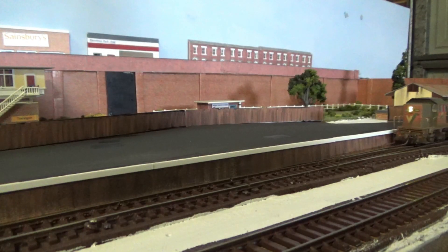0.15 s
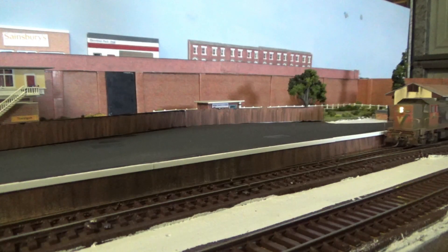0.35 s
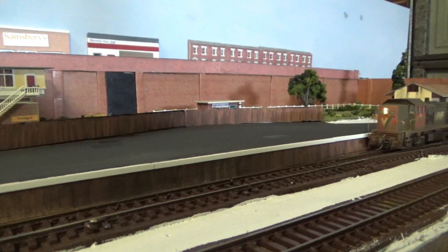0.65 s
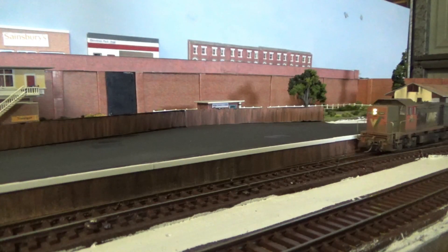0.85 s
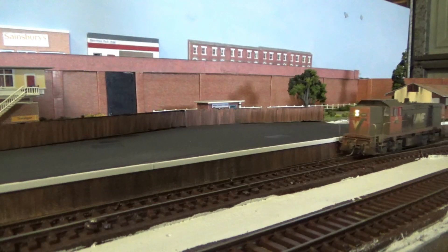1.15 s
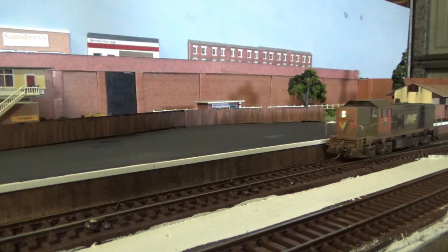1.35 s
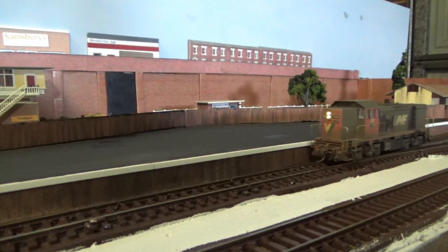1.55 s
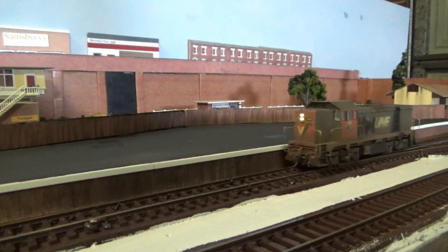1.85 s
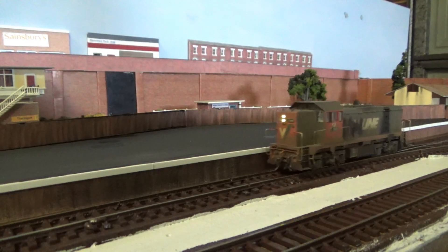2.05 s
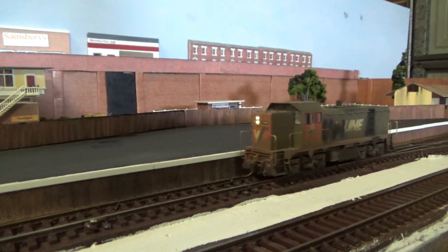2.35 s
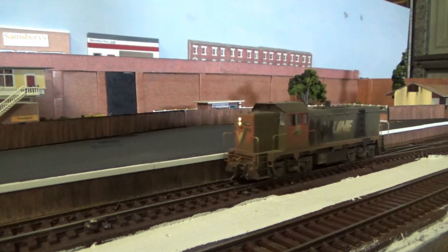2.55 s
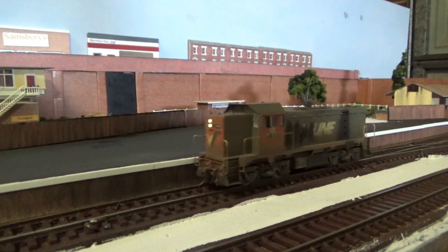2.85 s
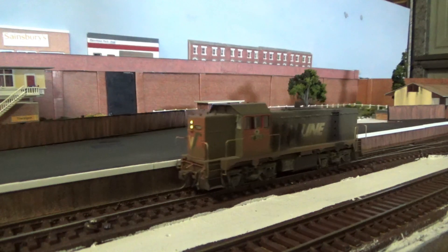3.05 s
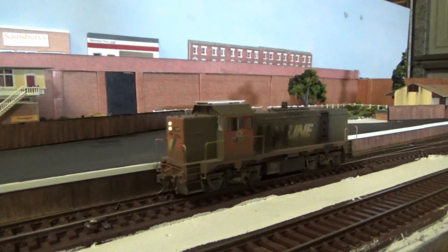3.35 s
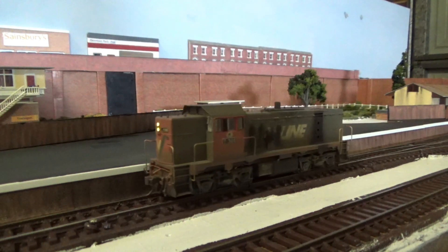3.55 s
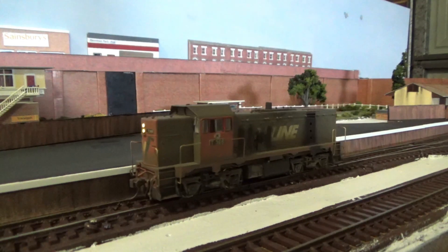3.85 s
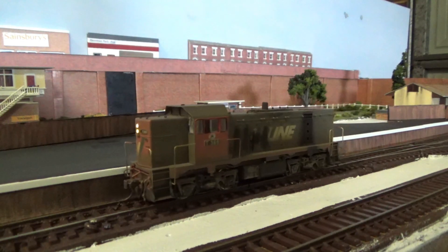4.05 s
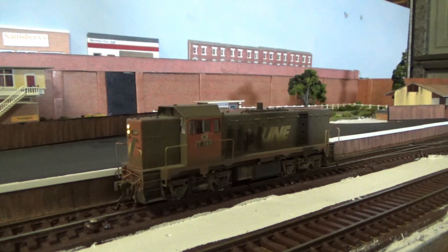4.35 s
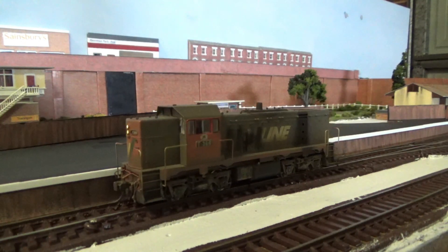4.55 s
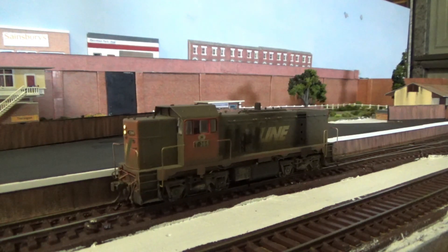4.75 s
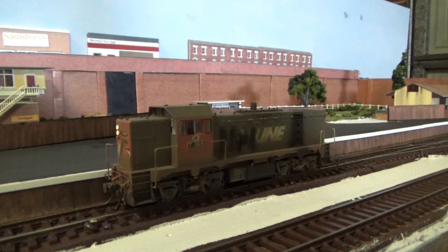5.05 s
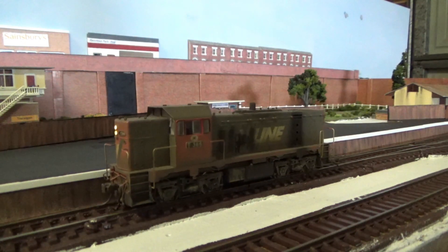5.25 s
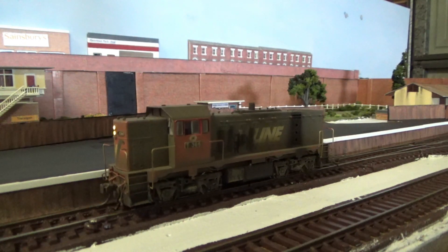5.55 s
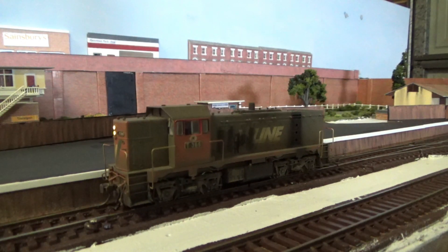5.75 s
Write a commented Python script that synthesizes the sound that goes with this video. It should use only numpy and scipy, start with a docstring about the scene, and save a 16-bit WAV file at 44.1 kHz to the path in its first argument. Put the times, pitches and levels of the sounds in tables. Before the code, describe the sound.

A model diesel locomotive rolls closer with rattling wheels and sharp clicks over rail joints, then slows to a buzzing crawl and stops.

```python
"""A small room with a model railway, the microphone about 0.3 m from the track.
A model diesel rolls up from under a metre away and slows to a stop. Its wheels drum on the baseboard,
knock over rail joints, tick on grit and squeak once; the pickup wipers sing thinly on them.
At a crawl the pulsed motor buzzes through the body shell until the drive cuts out with a soft click.
Mains hum and faint hiss lie behind it all."""
import sys
import numpy as np
from scipy import signal
from scipy.fft import rfft, irfft, next_fast_len
from scipy.io import wavfile
from scipy.ndimage import uniform_filter1d, map_coordinates

SR = 44100
rng = np.random.default_rng(int(sys.argv[2]) if len(sys.argv) > 2 else 0)


def put_to_file(sound):
    """Save the sound as 16-bit audio at rate SR, in the file named by the first command-line argument."""
    columns = np.atleast_2d(sound).T  # one column per channel
    safe = np.clip(columns, -1, 1)
    whole_steps = np.round(safe * 32767)
    wavfile.write(sys.argv[1], SR, whole_steps.astype(np.int16))


N = 259737
TIME = np.arange(N) / SR

# mains hum and faint whine: (frequency [Hz], rms level [dB])
HUM_LINES = [(100, -91), (150, -89), (200, -80.5), (300, -72.5), (400, -69), (500, -83), (7800, -93),
             (8759, -85)]
# decay of the room: (frequency [Hz], t60 [s])
ROOM_DECAY = [(200, 0.16), (1000, 0.91), (3000, 1), (10000, 0.44)]
# spectral shapes: (frequency [Hz], relative level [dB])
ROOM_SPECTRUM = [(200, 11), (1200, -1.5), (3000, -11), (10000, -32)]  # reverberation
AIR_SPECTRUM = [(15, -63), (25, -33.5), (169, -19.5), (192, -29), (229, -15.5), (296, -14.5), (362, -9.5),
                (401, -14), (433, -12.5), (685, -18.5), (819, -14), (7700, -26), (11000, -28), (14300, -65),
                (22000, -120)]  # room tone
RUMBLE_SPECTRUM = [(60, -20.5), (160, -11.5), (300, -5.5), (520, 0), (720, 5.5), (900, -2), (1200, -0.5),
                   (1600, -3), (2100, -5.5), (2700, -8), (3300, -29), (4500, -22), (9000, -33)]  # wheel treads
RAIL_SPECTRUM = [(1200, -50), (2200, 5), (3300, 5), (4200, -0.5), (5200, 1.5), (6300, -2), (7200, -15),
                 (9000, -7), (11000, -38)]  # rail hiss
GEAR_SPECTRUM = [(4000, -17), (6800, -3.5), (7900, 1.5), (8800, -0.5), (9500, 0), (10200, -2.5),
                 (11000, -7)]  # gear sizzle
CRACK_SPECTRUM = [(400, -24), (1500, 2.5), (2400, -4), (3300, -10), (4200, -8.5), (5100, -1.5),
                  (6700, -5.5), (8500, -7.5), (11000, -14)]  # hard contact
GRIT_SPECTRUM = [(500, -21), (2000, -33), (3500, 0), (5000, -3), (6500, 3.5), (8400, 5), (9700, 5.5),
                 (11000, -5.5)]  # bright ticks and crackle
# resonances: (frequency [Hz], width [Hz], relative level [dB])
TRACK_MODES = [(529, 16, -0.5), (716, 58, -5), (1019, 41, 0.5), (1125, 85, 3), (1218, 92, 2.5),
               (1390, 47, -13), (1593, 46, -0.5), (1890, 140, -9), (2580, 43, -33)]  # track on its board
SHELL_MODES = [(2318, 87, 12.5), (2570, 120, 0.5), (2750, 120, -2.5), (2980, 71, 0), (3305, 100, 2),
               (3395, 86, -7), (3960, 220, -2.5)]  # plastic body shell
FLANGE_MODES = [(3070, 600, -10.5), (5280, 160, 7), (6770, 600, 0.5), (8450, 470, 0), (9860, 240, 5.5),
                (11300, 400, -18)]  # squeaking wheel
# ringing of struck parts: (ratio to the blow's pitch, relative level [dB], t60 [s])
BOARD_MODES = [(.62, -28.5, 0.09), (.72, -13, 0.042), (.91, -8.5, 0.039), (1.0, -0.5, 0.029),
               (1.09, -7.5, 0.026), (1.35, -15, 0.04), (1.57, -20.5, 0.058)]
BOGIE_MODES = [(.77, -15, 0.066), (.9, -13, 0.053), (1.0, -1, 0.021), (1.13, -8, 0.014)]
ARMATURE_MODES = [(.93, 0, .018), (1.0, 4, 0.027), (1.07, -7, .018), (1.3, -1, 0.017)]
# the locomotive cruises, brakes and creeps: (time [s], speed [m/s])
LOCO_SPEED = [(0, 0.21), (2.95, .2), (3.4, 0.12), (4.2, 0.082), (4.8, 0.07), (5.3, 0.045), (5.89, 0.029)]
# motor drive: (time [s], pulse rate [Hz])
PULSE_RATE = [(0, 87.5), (2.2, 86), (2.9, 87.5), (3.25, 90), (3.43, 93), (3.57, 91.5), (3.72, 94.6),
              (4.03, 95.8), (4.12, 94.1), (4.22, 95.7), (4.33, 95.4), (4.42, 96.2), (4.52, 92.5),
              (4.61, 90.5), (4.72, 91.9), (4.8, 91.2), (4.9, 95.7), (5.03, 97.5), (5.17, 98), (5.28, 97.4),
              (5.42, 97.7), (5.52, 98.4), (5.62, 98.1)]
# uneven rail contact makes the buzz dip or surge: (middle [s], length [s], gain [dB])
CONTACT_SWELLS = [(3.555, 0.052, 8), (3.72, 0.12, 1.5), (3.924, 0.14, 5), (4.048, 0.09, -24),
                  (4.1, 0.039, 7), (4.19, .04, -1), (4.23, 0.039, 0.5), (4.334, 0.063, 3),
                  (4.42, 0.034, -6), (4.603, 0.45, 2.5), (4.87, 0.055, -7), (5.463, 0.091, -4),
                  (5.575, 0.11, 3.5)]
# clicks of the drive settling: (time [s], relative level [dB], pitch [Hz])
SETTLING_CLICKS = [(5.623, -45.5, 2680), (5.652, -56, 2800), (5.676, -61, 3520), (5.753, -57, 3500),
                   (5.834, -59, 3520)]
# spells of wiper singing: (middle [s], length [s], pitch [Hz], level [dB], width [Hz])
WIPER_SPELLS = [(0.356, 0.4, 8140, -67, 600), (1.45, 0.4, 8400, -66, 700), (2.473, 0.43, 9600, -66.5, 900),
                (4.614, 0.39, 9900, -71, 300)]
# wheel squeak: (start [s], end [s], level [dB])
FLANGE_SQUEAKS = [(4.010, 4.043, -44.5)]
# dirty stretches of rail: (middle [s], length [s], extra hiss [dB], extra crackle [dB])
DIRTY_RAIL = [(0.163, 0.18, 0.5, 9), (0.534, 0.11, 5.5, 11), (0.886, 0.36, 4, 6.5), (1.33, 0.2, 3, 8.5),
              (1.64, 0.14, 4, 5.5), (2.09, 0.49, 4.5, 3.5), (2.626, 0.044, 7, 4.5), (3.67, 0.46, 3.5, 1.5),
              (4.23, 0.3, 5, 7.5), (4.81, 0.33, 5.5, 5)]
# the loudest grit: (time [s], relative level [dB], knock against that level [dB])
GRIT_TICKS = [(0.1126, -35.5, -10), (0.1595, -39, -1.5), (0.3022, -44, -15), (0.5212, -40, -10),
              (0.6609, -37, -10), (0.7372, -41.5, -8), (0.797, -39, 3.5), (0.8295, -39.5, -1),
              (0.8594, -36, -12), (0.9168, -43.5, 4), (1.0141, -38, -13), (1.0783, -43.5, 4.5),
              (1.2077, -36.5, -15), (1.2785, -36.5, -4.5), (1.296, -37.5, -3), (1.5055, -33, -18),
              (1.5514, -31.5, -18), (1.5978, -32, -18), (1.6207, -36, -15), (1.6432, -35, -7.5),
              (1.6772, -41, -2), (1.8766, -32, -18), (2.0386, -20, -29), (2.6486, -31, -12),
              (2.774, -30.5, -27), (2.9257, -53, -22), (2.9612, -34, -23), (3.03, -33, -18),
              (3.159, -47, 1.5), (3.1837, -31.5, -18), (3.273, -31, -33), (3.3577, -33.5, -12.5),
              (3.555, -41, -8), (3.5738, -39, -20), (3.6026, -33, -23), (3.6262, -30.5, -30),
              (3.6985, -33, -19), (3.716, -30, -25), (3.789, -35, -17), (3.909, -40, -17),
              (3.977, -38.5, -26), (4.087, -48.5, -2.5), (4.164, -36.5, -20), (4.208, -41, -28),
              (4.2737, -39, -28), (5.175, -35, -28), (5.27, -39, -28)]
# rail joints and small bumps, at relative levels:
# (time [s], crack [dB], thud [dB], thud pitch [Hz], clack [dB], clack pitch [Hz])
RAIL_JOINTS = [(0.3440, -28, -21, 1036, -22, 2550), (0.627, -34.5, -19.5, 1176, -25.5, 2350),
               (0.933, -38.5, -37, 1090, -37.5, 2600), (1.7942, -25.5, -24, 1196, -30.5, 2910),
               (2.0856, -25, -17.5, 1084, -23.5, 2030), (2.687, -59, -37, 1140, -58, 2280),
               (2.742, -24.5, -30.5, 1145, -27, 2260), (2.8722, -36.5, -34.5, 1027, -37, 2500),
               (3.2132, -29.5, -34, 740, -29.5, 2170), (3.4, -45.5, -42, 796, -48, 2220),
               (4.385, -63, -49, 960, -56, 2040), (4.67, -69, -48, 1190, -65, 1930),
               (4.811, -60, -49, 880, -49.5, 1590), (4.923, -60, -59, 1139, -44.5, 2630),
               (4.945, -69, -48, 850, -50, 1490)]
# swells of the baseboard under the wheels: (time [s], relative level [dB])
BOARD_LEVEL = [(0.0, -56), (0.2, -54), (0.62, -55), (0.74, -54.5), (0.89, -59.5), (1.28, -59.5),
               (1.55, -59.5), (1.72, -54.5), (1.9, -56), (2.1, -53.5), (2.48, -60), (2.68, -59.5),
               (2.79, -57.5), (3.51, -66.5), (4.04, -76), (4.92, -70), (5.31, -75.5), (5.89, -83)]
# the band where the shell radiates well: (low edge [Hz], high edge [Hz])
SHELL_BAND = [2436, 3810]

CRUISE_M_PER_S = 0.2
START_M, PASSING_M = 0.79, 0.31  # distance along the track at the start; from track to microphone
# levels at cruising speed; each slope is in dB per tenfold speed
RUMBLE_DB, RUMBLE_SLOPE = -61.5, 18.5
RAIL_DB, RAIL_SLOPE = -61, 28
DRUM_TRIM_DB, DRUM_SLOPE = -0.05, 4.5  # on top of BOARD_LEVEL
GEAR_DB, GEAR_SLOPE, CRACKLE_DB = -70.5, 28, -2.5  # gears at 1 m; crackle against the gears
GEAR_LOSS_DB, BUZZ_LOSS_DB = 31.5, 8  # lost at tenfold distance
BUZZ_DB, MOTOR_OFF_S, MOTOR_FADE_S = -71.5, 5.64, 0.012  # buzz at 1 m; when and how fast it dies


def amp(db):
    """Decibels to gain."""
    return 10 ** (np.asarray(db) / 20)


def unit(x):
    """Scale to rms 1."""
    return x / np.sqrt(np.mean(x ** 2) + 1e-20)


def along(points, hz):
    """(Hz, value) points read on a log axis."""
    freqs, values = np.transpose(points)
    return np.interp(np.log(hz + 1), np.log(freqs + 1), values)


def curve(points):
    """(time, value) points read at every sample."""
    return np.interp(TIME, *np.transpose(points))


def swell(middle, length):
    """A rounded rise and fall, 0 to 1 and back."""
    return np.cos(np.pi * np.clip((TIME - middle) / length, -.5, .5))


def wobble(rate):
    """A smooth random curve, rate knots a second."""
    coarse = TIME[::32]
    knots = rng.standard_normal(int(N * rate / SR) + 4)
    return np.interp(TIME, coarse, map_coordinates(knots, [coarse * rate]))


def filtered(x, response):
    """x through a complex frequency response."""
    n = x.shape[-1]
    padded = next_fast_len(n + 8192)
    return irfft(rfft(x, padded) * response(np.fft.rfftfreq(padded, 1 / SR)), padded)[..., :n]


def coloured(x, spectrum):
    """x shaped by a spectrum, at rms 1."""
    return unit(filtered(x, lambda hz: amp(along(spectrum, hz))))


def resonate(x, modes):
    """x through (Hz, width, dB) resonances, at rms 1."""
    def response(f):
        return sum(amp(db) * 1j * f * width / (hz * hz - f * f + 1j * f * width)
                   for hz, width, db in modes)
    return unit(filtered(x, response))


def patchy(depth_db):
    """White noise with patches of random gain in time and frequency."""
    bins = signal.stft(rng.standard_normal(N), nperseg=512)[2]
    patches = uniform_filter1d(rng.standard_normal(bins.shape), size=5, axis=0)
    patches = uniform_filter1d(patches, size=20, axis=1)
    return unit(signal.istft(bins * amp(depth_db * unit(patches)), nperseg=512)[1][:N])


def add(track, s, sound):
    """Mix a sound into a track at time s."""
    part = track[max(round(s * SR), 0):][:len(sound)]
    part += sound[:len(part)]


def ring(modes, hz, t, attack):
    """Damped modes, struck together, at new strengths for each blow."""
    swing = sum(amp(db + rng.normal(0, 1) - 60 * t / t60) * np.sin(2 * np.pi * ratio * hz * t)
                for ratio, db, t60 in modes)
    return swing * (1 - np.exp(-t / attack))


def snap(spectrum, t, t60, tail_db, tail_t60):
    """A sharp burst of contact noise with a weak rattle after it."""
    burst = rng.choice([-1, 1], len(t)) * (amp(-60 * t / t60) + amp(tail_db - 60 * t / tail_t60))
    return filtered(np.pad(burst, (16, 0)), lambda hz: 1.5 * amp(along(spectrum, hz)))[16:]


def low_cut(x, corner_hz=580):
    """A low cut thins the bass of the knocks and ticks."""
    return signal.sosfilt(signal.butter(2, corner_hz, "highpass", fs=SR, output="sos"), x)


def journey():
    """Speed in decades against cruising, and distance from the microphone in decades against 1 m."""
    speed = curve(LOCO_SPEED)
    distance = np.hypot(START_M - np.cumsum(speed) / SR, PASSING_M)
    return np.log10(speed / CRUISE_M_PER_S), np.log10(distance)


def dirt():
    """Extra rail hiss and extra crackle on the dirty stretches, in dB."""
    return sum(np.outer([hiss_db, crackle_db], swell(s, length))
               for s, length, hiss_db, crackle_db in DIRTY_RAIL)


def room_tone():
    """Mains hum of the power supply over the hiss of the room."""
    clock = TIME + .00002 * wobble(27)  # slight unsteadiness blurs the high lines most
    hum = np.zeros(N)
    for hz, db in HUM_LINES:
        peak = np.sqrt(2) * amp(db + 0.24 * wobble(3.48))
        hum += peak * np.sin(2 * np.pi * hz * clock + rng.uniform(0, 2 * np.pi))
    mid, side = coloured(rng.standard_normal((2, N)), AIR_SPECTRUM)
    return hum + amp(-67) * (mid + amp(-4.5) * np.array([side, -side]))


def room_reverb(x):
    """The walls answer; each frequency dies at its own speed, nearly alike left and right."""
    hz, t, bins = signal.stft(rng.standard_normal((2, SR // 2)), SR, nperseg=256)
    tail = signal.istft(bins * amp(-60 * t / along(ROOM_DECAY, hz)[:, None]), SR, nperseg=256)[1]
    tail = np.pad(tail / np.linalg.norm(tail[0]), ((0, 0), (SR // 200, 0)))  # arrives 5 ms late
    reverb = signal.fftconvolve(x[None], tail, axes=1)[:, :N]
    mid, side = filtered(reverb, lambda hz: amp(along(ROOM_SPECTRUM, hz)))
    return mid + amp(-7.5) * np.array([side, -side])


def scenery_echoes(x, t60=0.09):
    """Platform and buildings send back early echoes that differ left and right."""
    t = TIME[:SR // 16]
    echoes = rng.standard_normal(len(t)) * amp(-60 * t / t60) * (t > .002)
    side = signal.fftconvolve(x, echoes / np.linalg.norm(echoes))[:N]
    return np.array([side, -side])


def wipers(edge_s=0.02):
    """Pickup wipers catch and sing on the wheels; friction blurs each note into a narrow band."""
    out = np.zeros(N)
    for s, length, hz, db, width_hz in WIPER_SPELLS:
        contact = np.clip((length / 2 - np.abs(TIME - s)) / edge_s, 0, 1)
        note = unit(filtered(rng.standard_normal(N), lambda f: np.exp(-(2 * (f - hz) / width_hz) ** 2)))
        out += amp(db) * contact * note
    return amp(2.4 * wobble(15)) * out


def flange():
    """A wheel flange sticks and slips against the rail in one short squeak."""
    gate = sum(amp(db) * np.clip(np.minimum(TIME - start, end - TIME) / .005 + .5, 0, 1)
               for start, end, db in FLANGE_SQUEAKS)
    return gate * resonate(rng.standard_normal(N), FLANGE_MODES) * amp(2.8 * wobble(300))


def gears(tick_t60=0.01, jitter_s=0.0009):
    """Gears sizzle and, with the pickups, tick twice a motor pulse; louder when fast and close."""
    pace, far = journey()
    level_db = GEAR_DB + GEAR_SLOPE * pace - GEAR_LOSS_DB * far
    sizzle = amp(level_db + 2.3 * wobble(200)) * coloured(patchy(depth_db=3), GEAR_SPECTRUM)
    tick_count = 2 * np.cumsum(curve(PULSE_RATE)) / SR
    onsets = np.flatnonzero(np.diff(np.floor(tick_count)))
    size, shift = rng.uniform(-1, 1, (len(onsets), 2)).T
    size_db = 10 * size + np.resize([6, -4, 2, -4], len(onsets))  # an uneven four-tick pattern
    onsets = np.clip(onsets + (shift * jitter_s * SR).astype(int), 0, N - 1)
    kicks = np.bincount(onsets, amp(size_db), N)
    bursts = signal.fftconvolve(kicks, amp(-60 * TIME[:SR // 20] / tick_t60))[:N]
    crackle = coloured(bursts * rng.standard_normal(N), GRIT_SPECTRUM)
    return sizzle + amp(level_db + CRACKLE_DB + dirt()[1]) * crackle


def settling():
    """The drive stops with a soft click, then ticks faintly a few times."""
    out, t = np.zeros(N), TIME[:SR // 16]
    for s, db, hz in SETTLING_CLICKS:
        add(out, s, amp(db - 2.5) * ring(ARMATURE_MODES, hz, t, attack=0.0011))
    return out


def buzz_gain():
    """The buzz grows toward the microphone, wavers with the current and ends when the drive is cut."""
    contact_db = sum(db * swell(s, length) for s, length, db in CONTACT_SWELLS) + 1.1 * wobble(22.1)
    powered = np.clip((MOTOR_OFF_S - TIME) / MOTOR_FADE_S, 0, 1)
    return powered * amp(BUZZ_DB - BUZZ_LOSS_DB * journey()[1] + contact_db)


def motor():
    """Each pulse of current kicks the armature and rings the body shell; it rattles less at a crawl."""
    rate = curve(PULSE_RATE) * (1 + .0008 * wobble(25))
    lag = (np.cumsum(rate) / SR % 1 - .5) * SR / rate  # samples from the nearest pulse
    kicks = np.sinc(lag) * np.exp(-(lag / 10) ** 2)
    rattle = rng.standard_normal(N) * np.exp(-np.abs(lag) / (0.0015 * SR)) * (lag > 0)
    looseness = np.interp(TIME, [3.0, 4.4], [.9, .15])
    force = (unit(kicks) + looseness * unit(rattle)) / np.sqrt(1 + looseness ** 2)
    band = signal.butter(3, SHELL_BAND, "bandpass", fs=SR, output="sos")
    shell = unit(signal.sosfilt(band, resonate(force, SHELL_MODES)))
    brushes = amp(-12) * coloured(rattle, CRACK_SPECTRUM)
    flutter_db = 3.2 * looseness * wobble(45)
    return buzz_gain() * amp(flutter_db) * (shell + brushes)


def stray_grit(count, level_db, spread_db, knock_db):
    """Finer grains lie at random along the track, met less often as the wheels slow; rows as GRIT_TICKS."""
    travelled = np.cumsum(curve(LOCO_SPEED))
    place, fineness, softness = rng.uniform(0, 1, (count, 3)).T
    times = np.interp(place * travelled[-1], travelled, TIME)
    return np.column_stack([times, level_db - spread_db * fineness, knock_db - spread_db * softness])


def grit():
    """Grit under the wheels snaps brightly; the coarser grains also knock the bogie."""
    out, t = np.zeros(N), TIME[:SR // 16]
    strays = stray_grit(count=24, level_db=-45, spread_db=13, knock_db=-7)
    for s, db, knock_db in [*GRIT_TICKS, *strays]:
        tick = snap(GRIT_SPECTRUM, t, t60=0.0054, tail_db=-17.5, tail_t60=0.028)
        crack = snap(CRACK_SPECTRUM, t, t60=0.0089, tail_db=-7, tail_t60=0.031)
        clack = ring(BOGIE_MODES, 2340, t, attack=0.0005)
        add(out, s + 0.0014, amp(db - 10) * tick)
        add(out, s + 0.00072, amp(db + knock_db + 2.5) * crack)
        add(out, s + 0.00076, amp(db + knock_db - 8) * clack)
    return low_cut(out)


def joints(track_db=-23.5, track_t60=0.11):
    """A wheel drops into a rail gap: steel cracks, the bogie clacks, the board thuds, the track rings."""
    out, t = np.zeros(N), TIME[:SR // 4]
    for s, crack_db, thud_db, thud_hz, clack_db, clack_hz in RAIL_JOINTS:
        crack = snap(CRACK_SPECTRUM, t, t60=0.005, tail_db=-9, tail_t60=0.024)
        clack = ring(BOGIE_MODES, clack_hz, t, attack=.0002)
        thud = ring(BOARD_MODES, thud_hz, t, attack=.0009)
        track = resonate(rng.standard_normal(len(t)), TRACK_MODES)
        add(out, s, amp(crack_db + 5) * crack)
        add(out, s + .0003, amp(clack_db - 1) * clack + amp(thud_db - 1.5) * thud)
        add(out, s + .0024, amp(thud_db + track_db - 60 * t / track_t60) * track)
    return low_cut(out)


def wheels():
    """Rough wheel treads rumble, drum on the board and hiss on the rails."""
    pace = journey()[0]
    board_db = curve(BOARD_LEVEL)
    swell_db = 0.32 * (board_db - board_db.mean())  # the rumble partly follows the board
    rumble_db = RUMBLE_DB + RUMBLE_SLOPE * pace + swell_db
    drum_db = board_db + DRUM_TRIM_DB + DRUM_SLOPE * pace
    rail_db = RAIL_DB + RAIL_SLOPE * pace + dirt()[0]
    shudder_db = wobble(30.57)
    bumps = amp(shudder_db + 1.6 * wobble(120))
    rumble = amp(rumble_db) * bumps * coloured(patchy(depth_db=2), RUMBLE_SPECTRUM)
    drum = amp(drum_db) * resonate(bumps * rng.standard_normal(N), TRACK_MODES)
    flicker_db = shudder_db + 3.66 * wobble(150)
    hiss = amp(rail_db + flicker_db) * coloured(patchy(depth_db=1.13), RAIL_SPECTRUM)
    return rumble + drum + hiss


def scene():
    """The locomotive close up, a hair right of centre, with the layout and the room around it."""
    loco = wheels() + gears() + motor() + joints() + grit() + flange() + wipers() + settling()
    direct = loco * amp([[-.15], [.15]])
    return direct + amp(-11) * scenery_echoes(loco) + amp(-9.5) * room_reverb(loco) + room_tone()


def record(dry):
    """The treble is cut off steeply near 11 kHz, with a faint skirt above it."""
    def response(hz):
        passband = (1 + (hz / 11040) ** 260) ** -.5
        skirt = amp(-39) / (1 + (hz / 15000) ** 18)
        return np.maximum(passband, skirt)
    return filtered(dry, response)


dry = scene()
out = record(dry)
put_to_file(out)
```